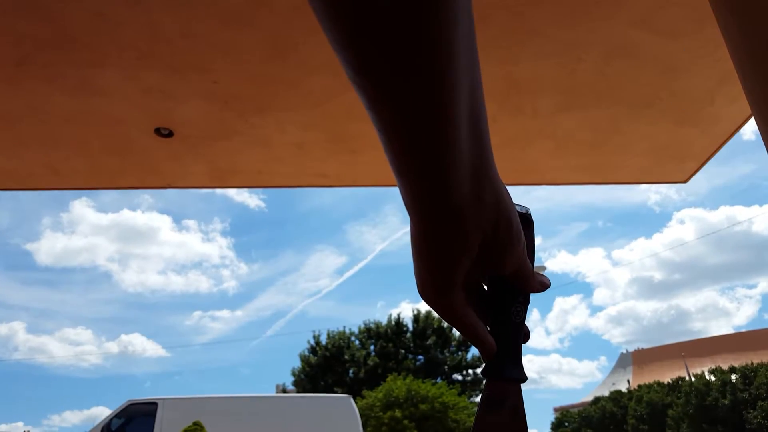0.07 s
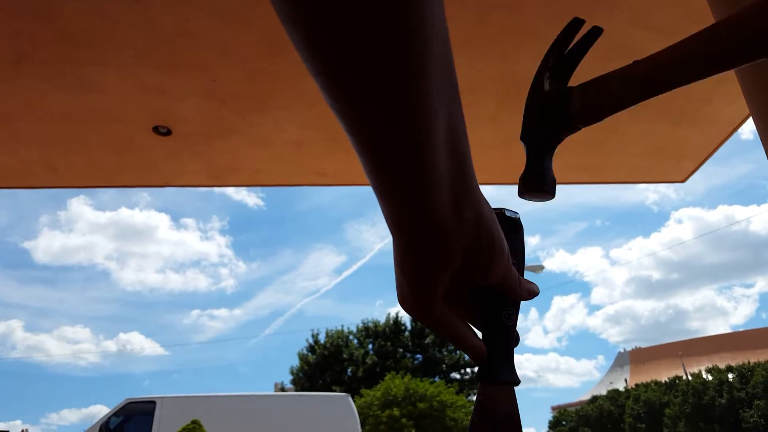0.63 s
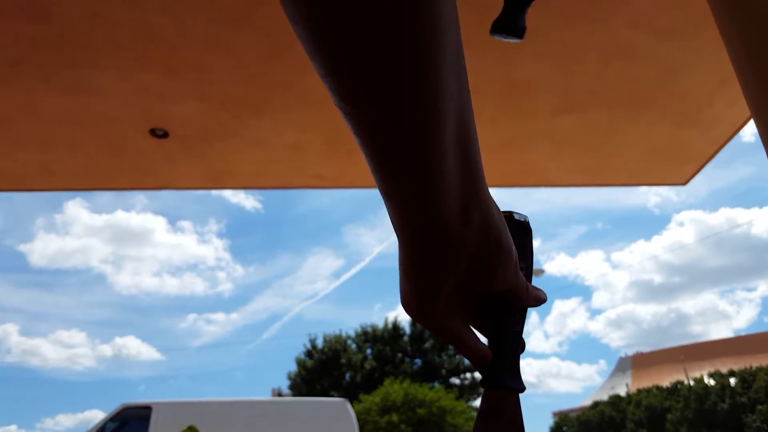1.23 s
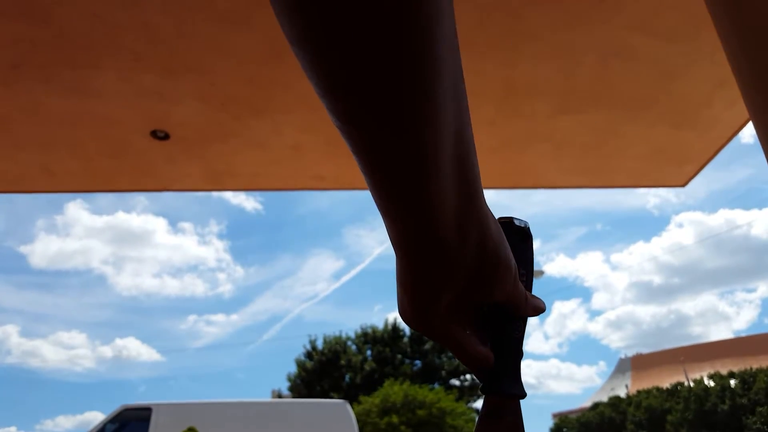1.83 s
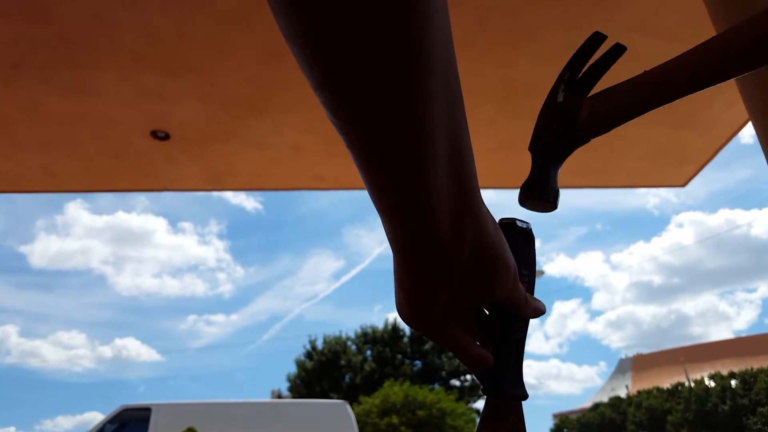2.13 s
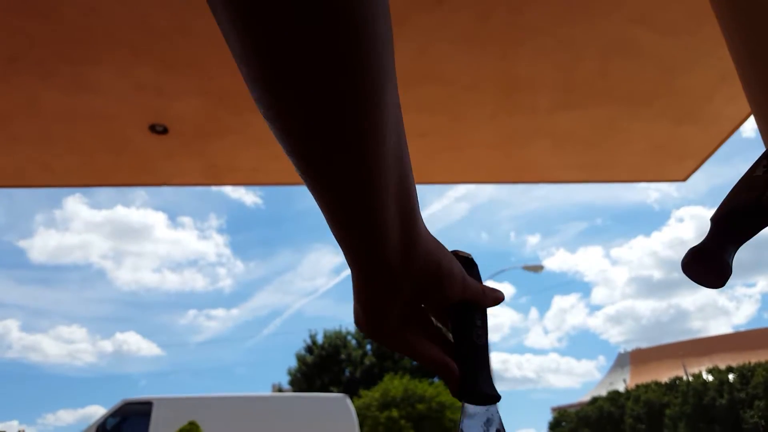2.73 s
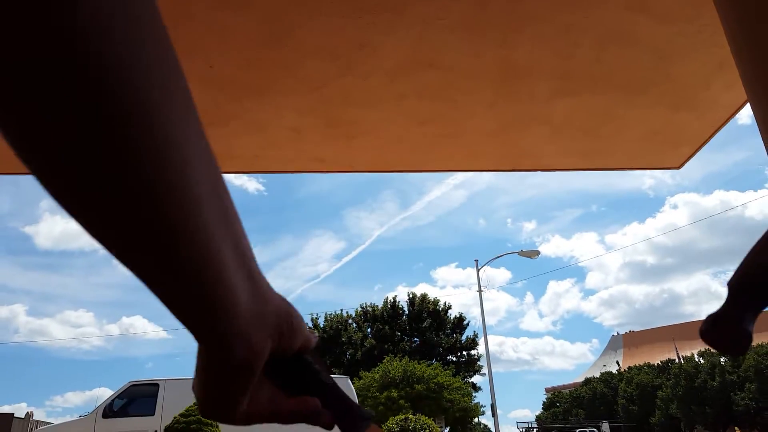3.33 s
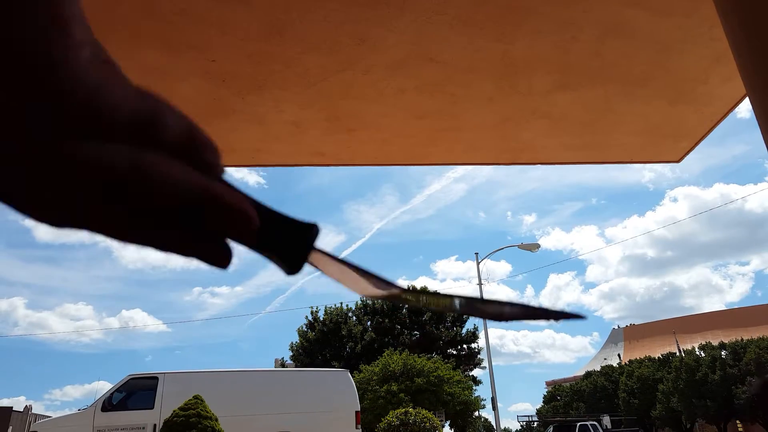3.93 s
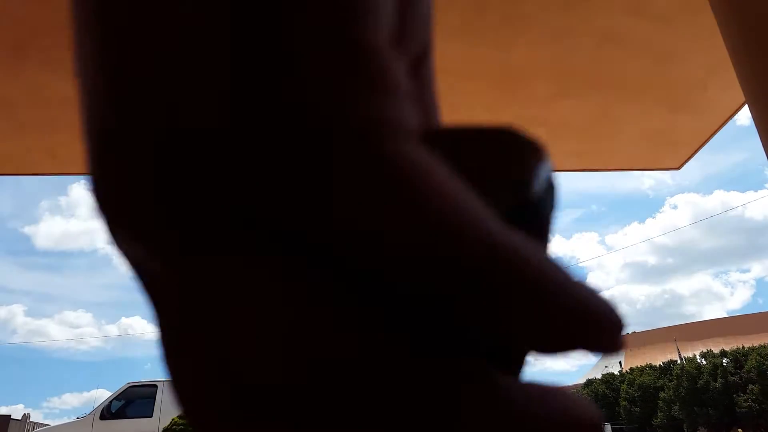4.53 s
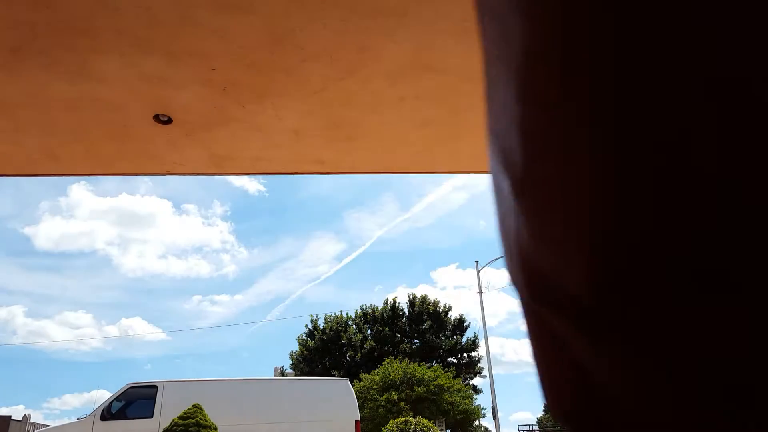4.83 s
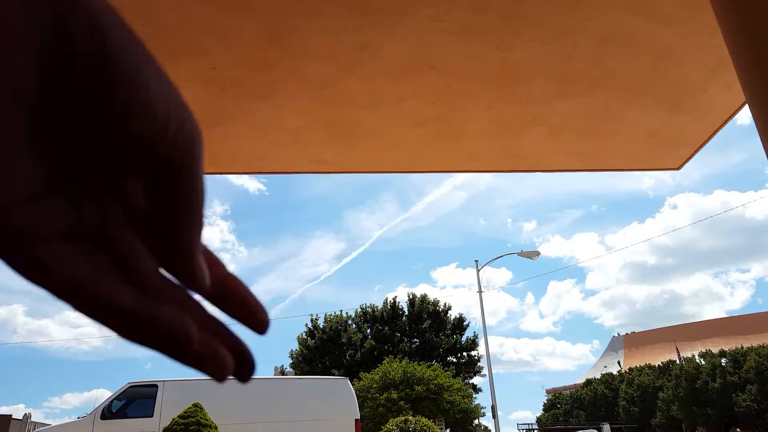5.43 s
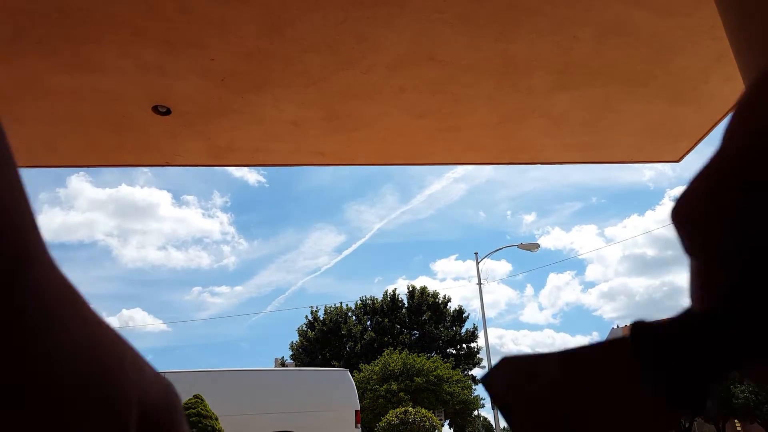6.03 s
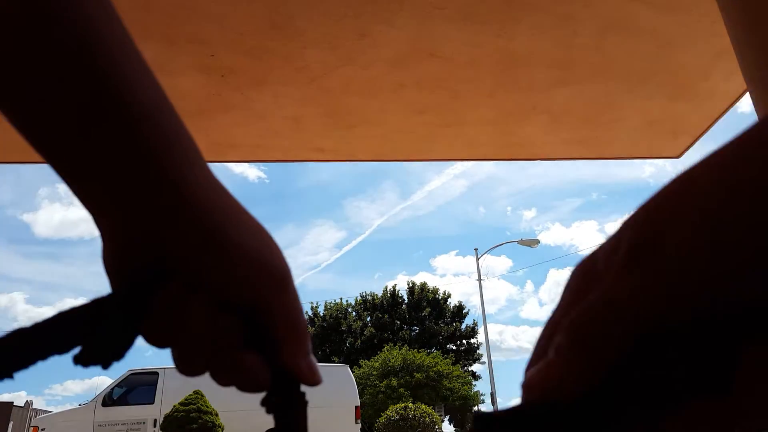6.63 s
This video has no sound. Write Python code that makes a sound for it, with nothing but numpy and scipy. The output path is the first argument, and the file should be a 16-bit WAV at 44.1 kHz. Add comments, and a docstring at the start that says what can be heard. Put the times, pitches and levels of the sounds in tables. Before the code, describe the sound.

From about 0.3 to 2.1 seconds a hammer strikes a putty knife into a concrete joint six times, close by and evenly, about three hits a second. Each is a sharp crack of grit with a dull thump and a bright steel ring, echoing briefly under a porch roof. Around 3 seconds the blade scrapes free with a few faint ticks. From 4.2 to 4.6 the knife clatters onto the slab, ringing thinly, and the hammer knocks down after it, with more loud knocks near 5.1. Short sandy scrapes run between them. Lighter clinks and scrapes follow from 5.4 to 6 as another blade is picked up, then faint scratches and one last clank near 6.6. Low traffic rumbles behind, dipping during the hammering and returning from about 3 seconds, over a faint steady hiss.

```python
"""Six sharp taps ring out under a porch roof: a hammer drives a putty knife into a concrete joint.
The blade scrapes free, hammer and knife clatter onto the slab, and another blade is picked up.
Each hit is a crack of crushed grit and a thump of the slab, mostly with ringing steel on top;
each scrape is a stream of tiny catches on sand. The ceiling and a far wall throw the sounds back.
Traffic rumbles behind, over a faint hiss."""
import sys
import numpy as np
from scipy import signal
from scipy.fft import rfft, irfft, next_fast_len
from scipy.io import wavfile
from scipy.ndimage import uniform_filter1d

SR = 44100
rng = np.random.default_rng(int(sys.argv[2]) if len(sys.argv) > 2 else 0)


def transcribe(u):
    """Save the signal u as a 16-bit wav file named by the first command-line argument.

    u: samples, shape (n,) or (channels, n), limited to [-1, 1]; the rate is SR.
    q: integer samples, one column per channel.
    """
    v = np.clip(np.atleast_2d(u).T, -1, 1)
    q = np.round(v * 32767).astype(np.int16)
    wavfile.write(sys.argv[1], SR, q)


N = 294147

# ringing notes of the hammer head and claws: f/Hz, level/dB, ring time/s (to fade by 60 dB)
HAMMER_NOTES = [(996, -5, .07), (1680, -7, .06), (4340, -8, .17), (4506, -10, .17), (4958, -28, 1.1),
                (4962, -37, 1.1), (5340, -14, .1), (7090, -4, .1), (14410, 4.5, .115), (14770, 3, .105)]
# pitch ranges that the knife handle boosts in a hit: f/Hz, width/Hz, boost/dB
HANDLE_PEAKS = [(540, 90, 1), (930, 150, 1), (1550, 250, 8), (3350, 500, 2), (7200, 700, 0), (8050, 500, 2)]
# pitch ranges that the blade boosts: f/Hz, width/Hz, boost/dB
BLADE_PEAKS = [(565, 70, 10), (1060, 120, 6), (1800, 70, 9), (2030, 80, 10), (2420, 200, 8), (3450, 400, 7),
               (4100, 300, 6), (5000, 400, 4), (7080, 120, 11), (7520, 150, 12), (8050, 350, 9),
               (11150, 350, 10), (12200, 250, 7), (15200, 400, 8)]
# how much louder the tools are on the left: f/Hz, left minus right/dB
TOOL_BALANCE = [(100, 1.5), (300, 2.5), (600, -1), (1100, -2), (2100, -2), (4500, 3.5), (8000, 1.5),
                (14000, -4)]


def blows():
    """The hammer drives the knife into the joint and rings; yields (time, sound, porch level)."""
    # t/s, level/dB, weight/dB, brightness/dB, hammer ring/dB, porch/dB
    hits = [(0.3265, -20, 4, 0, -1.5, 0), (0.6732, -13.5, -4, -1.5, -7.5, -6),
            (1.0229, -16.5, -4.5, 1.5, -11, -7), (1.3761, -17, 2, 4, -9, -7.5),
            (1.7278, -14.5, 5, -2, -12, -9.5), (2.0615, -17, 4, -2, -10, -8)]
    # gain/dB in each of the five bands of strike()
    tone = [-1.5, 1, 0, -1, 0]
    for start, db, weight_db, bright_db, ring_db, porch_db in hits:
        sound = strike(db, tone, weight_db, bright_db, HANDLE_PEAKS, [(HAMMER_NOTES, ring_db)])
        yield start, sound, porch_db


def clanks(heel_bright_db=-4, heel_ring_db=-3, choke_s=.06, porch_db=-20):
    """The blade lands tip first and rings; its heel follows with a duller slap, cut short by the slab."""
    # t/s, level/dB, weight/dB, brightness/dB, blade ring/dB, heel delay/s, heel against tip/dB
    landings = [(4.2534, -24, 17, 19, 0, .0056, -6), (4.3505, -24, 14, -10, -14, .003, 0),
                (4.3842, -14, -1, -4, -3, .0033, 1), (4.428, -28.5, -3, 4, -2, .004, -1),
                (4.4505, -24, 2, 3, -20, .002, -1), (4.4724, -25, 0, 5, -5, .0086, -1),
                (4.5258, -25, 4, 6, -15, .0042, -1), (5.2391, -36, 5, -5, -20, .002, -2),
                (5.3868, -25, -2, 4, -1.5, .002, -8), (5.5859, -33, 2, -3, 0, .002, -4),
                (5.6058, -22, -14, 3, -2, .0092, -5), (5.8667, -30, -3, -9, -2, .002, -5),
                (5.8907, -31.5, 0, -5, -12, .002, -4), (5.9121, -31.5, -2, 3, -6, .003, -1),
                (5.9326, -30.5, -12, -8, -8, .0064, 4), (6.6494, -22, 1, 8, 1, .0096, -2)]
    # ringing notes of the thin blade: f/Hz, level/dB, ring time/s
    blade_notes = [(556, -13, .25), (1790, -6, .055), (2013, 1.5, .075), (2400, -8, .04), (3887, -28, .3),
                   (4064, -7, .22), (4072, -23, .8), (7041, -7, .05), (7526, -7, .03), (10850, -8, .08),
                   (11190, -6, .035), (12190, -14, .04)]
    # gain/dB in each of the five bands
    tone = [-15, -7, 0, 1, -12]
    choked = [(hz, db, min(ring_s, choke_s)) for hz, db, ring_s in blade_notes]
    for start, db, weight_db, bright_db, ring_db, heel_s, heel_db in landings:
        tip = strike(db, tone, weight_db, bright_db, BLADE_PEAKS, [(blade_notes, ring_db)])
        heel = strike(db + heel_db, tone, weight_db, bright_db + heel_bright_db,
                      BLADE_PEAKS, [(choked, heel_ring_db)])
        yield start, tip, porch_db
        yield start + heel_s, heel, porch_db


def drops(thump_db=-15):
    """Hammer and knife are put down and rock to rest; bare steel sizzles, a padded grip does not."""
    # t/s, level/dB, weight/dB, sizzle/dB, hammer ring/dB, grip ring/dB, porch/dB
    landings = [(4.6115, -18.5, 6, -16, -2, -25, -12), (4.658, -26.5, 9, -8, 3, -25, -8),
                (5.0561, -17.5, -4, -11, -21, -3.5, -8), (5.096, -16, -7, 14, -15, -12, -6.5),
                (5.1728, -32, 0, 15, -14, -20, -20)]
    # ringing notes of a tool grip: f/Hz, level/dB, ring time/s
    grip_notes = [(511, 0, 0.16), (1626, -7, 0.058), (2223, -2, 0.044)]
    # gain/dB in each of the five bands
    base_tone = [-2, -1, 0, 2, -15]
    for start, db, weight_db, sizzle_db, head_db, grip_db, porch_db in landings:
        tone = base_tone[:-1] + [base_tone[-1] + sizzle_db]
        rings = [(HAMMER_NOTES, head_db), (grip_notes, grip_db)]
        yield start, strike(db, tone, weight_db, 0, HANDLE_PEAKS, rings, thump_db), porch_db


def ticks(porch_db=-15):
    """The edge touches loose chips, too lightly to make a tool ring."""
    # t/s, level/dB, brightness/dB
    touches = [(2.9455, -51, 11), (3.0418, -50, 13), (3.112, -50, 9), (4.064, -59, 6), (4.418, -33, -8),
               (4.5532, -38, -5), (4.85, -40, -5), (5.1229, -30, -11), (5.4956, -43, -17),
               (5.6502, -40, -14), (5.6702, -39, -17)]
    # gain/dB in each of the five bands
    tone = [-8, -6, 0, 0, -5]
    for start, db, bright_db in touches:
        yield start, strike(db, tone, 0, bright_db, BLADE_PEAKS), porch_db


def strike(level_db, tone, weight_db, bright_db, resonances, rings=(), thump_db=-7):
    """One hit: the slab thumps, grit cracks, and any tools listed in rings ring along."""
    # centres of five bands (thud, body, middle, bright, sizzle): f/Hz
    bands = [200, 750, 2100, 5500, 13000]
    # share of weight_db that each band gets: weight lifts the lows
    by_weight = [1, .55, 0, 0, 0]
    # share of bright_db that each band gets: brightness lifts the highs
    by_brightness = [0, 0, 0, .65, 1.1]
    # low notes of the slab: f/Hz, level/dB, ring time/s
    slab_notes = [(47, -21, .12), (78, -13, .11), (112, -4, .09), (165, -2, .08), (240, -4, .06)]
    colour_db = np.add(tone, weight_db * np.array(by_weight) + bright_db * np.array(by_brightness))
    tilt = list(zip(bands, colour_db))
    out = amp(colour_db[0] + thump_db) * ring(slab_notes, [(hz, 0) for hz in bands])
    add(out, 0, crack(tilt, resonances))
    for notes, ring_db in rings:
        out += amp(ring_db) * ring(notes, tilt)
    return amp(level_db) * out


def crack(tilt, resonances, decay_s=.002, chatter_db=-21, chatter_s=.007, span_s=.009, size=4096):
    """Steel crushes grit: a very short burst of noise and a weak chatter, coloured by the tool."""
    # tone of steel on concrete: f/Hz, level/dB
    spectrum = [(40, -24), (110, -8), (300, -4), (600, -2), (1020, -1.5), (1270, -6), (2100, -2),
                (3100, -9), (5500, -15.5), (7500, -5), (8200, -9.5), (9100, -26), (10500, -22),
                (13500, -12), (16000, -20)]
    t, hz = np.arange(size) / SR, bins(size)
    envelope = np.exp(-t / decay_s) + amp(chatter_db) * np.exp(-t / chatter_s)
    burst = rfft(stereo_noise(size, likeness=.6) * envelope)
    burst /= np.sqrt(uniform_filter1d(abs(burst) ** 2, size=140))  # even out chance peaks
    colour_db = read(spectrum, hz) + boosts(resonances, hz)
    response = [causal(colour_db + read(tilt, hz) + side * read(TOOL_BALANCE, hz)) for side in (.5, -.5)]
    # scale by the middle band, as if its energy were spread over span_s
    middle_power = np.sum(amp(colour_db)[(hz > 1500) & (hz < 3000)] ** 2)
    sound = irfft(burst * np.array(response)) * np.sqrt(span_s * SR * size / (2 * middle_power))
    fade_out = np.minimum(1, 2 * (1 - t / t[-1])) ** 2
    return sound * fade_out


def ring(notes, tilt, pivot_hz=4300):
    """A struck object rings with pure, fading notes; a brighter hit stirs the high ones more."""
    t, out = np.arange(SR) / SR, np.zeros((2, SR))
    side = np.array([[.5], [-.5]])
    for hz, db, ring_s in notes:
        count = min(SR, int(ring_s * 1.5 * SR))
        gain = amp(db + read(tilt, hz) - read(tilt, pivot_hz) + side * read(TOOL_BALANCE, hz))
        wave = np.sin(2 * np.pi * (hz * t[:count] + rng.random()))
        out[:, :count] += gain * np.exp(-np.log(1000) * t[:count] / ring_s) * wave
    fade_in = 1 - np.exp(-t / .0005)
    return out * fade_in


def tools():
    """Every hit, as heard directly and as sent into the porch."""
    direct, sent = np.zeros((2, 2, N))
    for kind in blows, clanks, drops, ticks:
        for start, sound, porch_db in kind():
            add(direct, start, sound)
            add(sent, start, amp(porch_db) * sound)
    return direct, sent


def scrapes(grains_per_s=800, grain_db=5.5, grain_decay_s=.0005, taper=.4, peak_strength=1.1):
    """The edge catches on sand grains of very uneven size, each rattling the blade."""
    # start/s, end/s, level/dB, treble slope/(dB per octave)
    strokes = [(2.78, 2.95, -63, 2), (2.955, 3.025, -39.5, -2.5), (3.02, 3.18, -53, 2.5),
               (4.41, 4.445, -34, 1), (4.485, 4.60, -34, 2), (4.66, 4.75, -45, 1.5), (4.79, 4.93, -46, 1.5),
               (5.085, 5.22, -37.5, -.3), (5.2, 5.32, -49, 3), (5.61, 5.68, -44, -2),
               (5.91, 5.955, -41, -2), (6.19, 6.29, -58, -.5), (6.36, 6.46, -57, -1)]
    # hiss of the grit: f/Hz, level/dB
    spectrum = [(100, -32), (550, -9), (1000, -6), (1300, -8), (2100, -3), (3200, -9), (4200, -11.5),
                (5800, -12), (7800, -9), (9500, -20), (12200, -17), (16000, -24.5)]
    out, hz = np.zeros((2, N)), bins(2048)
    blade_db = read(spectrum, hz) + peak_strength * boosts(BLADE_PEAKS, hz)
    for start, end, db, slope_db in strokes:
        count = int((end - start) * SR)
        catches = rng.random(count) < grains_per_s / SR
        sizes = amp(grain_db * np.minimum(rng.exponential(1, count), 3))
        envelope = signal.lfilter([1], [1, -np.exp(-1 / (grain_decay_s * SR))], catches * sizes)
        grains = stereo_noise(count, likeness=.5) * envelope * signal.windows.tukey(count, taper)
        rattle = irfft(causal(blade_db + slope_db * np.log2(hz / 1000 + 1)))
        stroke = signal.fftconvolve(grains, rattle[None], axes=1)
        add(out, start, amp(db) * unit(stroke))
    return out


def porch(x, first_s=.0105, spacing=22):
    """Ceiling and walls answer after about 10 ms and die away; a far wall answers once more."""
    # how long the porch rings: f/Hz, ring time/s
    ring_times = [(100, 0.01), (500, 0.2918), (1000, .32), (2200, .32), (4500, .34), (7500, .35),
                  (10000, .23), (15000, .23)]
    # tone of that ringing: f/Hz, gain/dB
    colour = [(100, -1.5), (300, -7), (700, 2), (2000, -9.5), (4500, -.5), (7500, -3), (10000, -4.5),
              (15000, -5)]
    # single echoes: delay/s, level/dB
    echoes = [(.0115, -12), (.0135, -11), (.0235, -15), (.039, -16), (.1715, -35)]
    # a dense crowd of reflections, one at a random place in each short slot
    count = SR // spacing - 1
    places = np.arange(count) * spacing + rng.integers(0, spacing, (2, count))
    reflections = np.zeros((2, SR))
    np.put_along_axis(reflections, places, rng.choice([-1., 1.], places.shape), 1)
    reflections[:, :int(first_s * SR)] = 0
    hz, t, spectra = signal.stft(reflections, SR, nperseg=256)
    spectra = spectra * np.exp(-np.log(1000) * t / read(ring_times, hz)[:, None])
    strength = np.linalg.norm(signal.istft(spectra, SR)[1][0])
    tail = signal.istft(spectra * amp(read(colour, hz))[:, None], SR)[1] / strength
    for delay, db in echoes:
        tail[[0, 1], int(delay * SR) + rng.integers(0, 20, 2)] += amp(db)
    return signal.fftconvolve(x, tail, axes=1)[:, :N]


def traffic(rumble_db=0, road_db=-4.5, patchy_db=1.5, left_db=1, split_hz=300):
    """Low rumble and tyre noise in the background, at a level that follows a set curve."""
    # tone of the traffic: f/Hz, level/dB
    spectrum = [(15, -46.5), (25, -22), (48, -11), (65, -10), (103, 1), (249, -7.5), (314, -14), (384, -16),
                (421, -15), (565, -17), (610, -13), (857, -19.5), (1000, -16.5), (1300, -39.5),
                (2200, -120)]
    # shape of its treble, added to that: f/Hz, gain/dB
    treble = [(1000, -10), (1090, -8), (1200, -29), (1450, -25), (1700, -20), (2400, -29), (3200, -38),
              (5500, -44), (8000, -43), (9300, -55), (13500, -51), (16000, -54)]
    # how alike left and right are: f/Hz, likeness (0 to 1)
    likeness = [(60, .82), (200, .84), (350, .6), (520, .7), (800, .35), (1100, .3), (1300, .88),
                (1900, .4), (2300, .8), (2800, .2), (3300, .6), (4500, .15)]
    # the background level dips during the hammering and after the clatter, then returns: t/s, gain/dB
    level_curve = [(0.0, -35), (0.2, -35), (0.65, -42), (0.78, -47), (1.06, -48), (1.28, -46), (1.49, -52),
                   (2.01, -51), (2.34, -56), (2.65, -55), (3.08, -40), (3.42, -37), (4.48, -35),
                   (4.85, -39), (5.03, -39), (5.33, -45), (5.78, -44), (6.67, -35)]
    hz, frames = bins(2048), N // 512 + 3
    left_re, left_im, own_re, own_im, patches = rng.standard_normal((frames, len(hz), 5)).T
    same = np.clip(read(likeness, hz), 0, 1)[:, None]
    left = left_re + 1j * left_im
    right = same * left + np.sqrt(1 - same ** 2) * (own_re + 1j * own_im)
    # the tone wavers in patches, smooth across pitch and time
    patches = unit(uniform_filter1d(uniform_filter1d(patches, size=12, axis=0), size=8, axis=1))
    colour_db = read(spectrum, np.minimum(hz, 950)) + read(treble, hz)
    spectra = np.array([left, right]) * amp(colour_db[:, None] + patchy_db * patches)
    low = 1 / (1 + (hz[:, None] / split_hz) ** 6)
    out = np.zeros((2, N))
    for share, db in (low, rumble_db), (1 - low, road_db):
        layer = signal.istft(spectra * share, nperseg=2048, noverlap=1536)[1][:, :N]
        out += amp(db) * unit(layer)
    level_db = np.interp(np.arange(N) / SR, *np.transpose(level_curve))
    return out * amp(level_db) * amp([[left_db / 2], [-left_db / 2]])


def hiss(level_db=-73.5):
    """A faint, steady hiss under everything."""
    # tone of the hiss: f/Hz, level/dB
    spectrum = [(100, -5), (1400, 2), (3200, -3), (5000, -3), (8000, -2), (9300, -12), (16000, -12)]
    coloured = rfft(stereo_noise(N, likeness=.2)) * amp(read(spectrum, bins(N)))
    return amp(level_db) * unit(irfft(coloured, N))


def amp(db):
    """Turns decibels into a gain."""
    return 10 ** (np.asarray(db) / 20)


def unit(x):
    """Scales a sound to an average power of 1."""
    return x / np.sqrt(np.mean(x ** 2) + 1e-20)


def read(points, hz):
    """Looks up a table of (f/Hz, value), joining its points on a log-frequency axis."""
    f, value = np.transpose(points)
    return np.interp(np.log(hz + 1), np.log(f + 1), value)


def add(mix, start_s, sound):
    """Mixes a stereo sound in at the given time."""
    part = mix[:, round(start_s * SR):][:, :sound.shape[1]]
    part += sound[:, :part.shape[1]]


def bins(size):
    """Frequencies in the spectrum of this many samples."""
    return np.fft.rfftfreq(size, 1 / SR)


def causal(db):
    """A filter with these gains that makes no sound before a hit (minimum phase)."""
    log_gain = np.log(amp(np.r_[db, db[-2:0:-1]]))
    return np.exp(np.conj(signal.hilbert(log_gain)))[:len(db)]


def boosts(resonances, hz):
    """Gain in dB of a few broad peaks on an otherwise even tone."""
    peaks = sum(amp(db) ** 2 / (1 + (2 * (hz - f) / width) ** 2) for f, width, db in resonances)
    return 10 * np.log10(1 + peaks)


def stereo_noise(size, likeness):
    """White noise that is partly the same on the left and right."""
    shared, own = rng.standard_normal(size), rng.standard_normal((2, size))
    return np.sqrt(likeness) * shared + np.sqrt(1 - likeness) * own


def scene(scrape_porch_db=-10):
    """Nearby tools and scraping, their echoes, the street and the hiss."""
    direct, sent = tools()
    grit = scrapes()
    return direct + grit + porch(sent + amp(scrape_porch_db) * grit) + traffic() + hiss()


def record(dry, top_hz=16200):
    """Widens the stereo, clips the hardest cracks as they overload the input, and cuts the top treble."""
    # stereo widening: above about 1 kHz, left lags right by about 0.4 ms: f/Hz, phase/rad
    phase_lag = [(600, 0), (1020, .5), (1250, 3.1), (1550, 3.6), (2300, 6.3), (3300, 9.4), (4250, 12.7),
                 (5300, 15.7), (16000, 46)]
    size = next_fast_len(N + SR // 10)
    lag = np.interp(bins(size), *np.transpose(phase_lag))
    shift = np.exp(1j * np.array([-lag, lag]) / 2)
    widened = irfft(rfft(dry, size) * shift, size)[:, :N]
    clipped = widened / (1 + widened ** 8) ** (1 / 8)
    treble_cut = signal.firwin(255, top_hz, window=("kaiser", 8), fs=SR)
    return signal.oaconvolve(clipped, treble_cut[None], "same")


dry = scene()
out = record(dry)
transcribe(out)
```